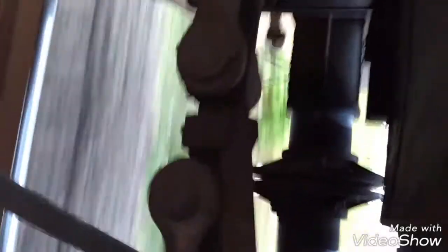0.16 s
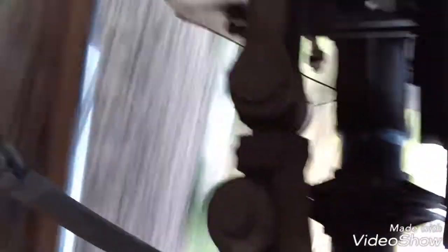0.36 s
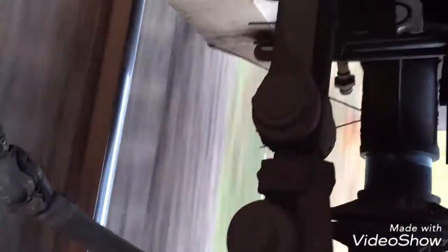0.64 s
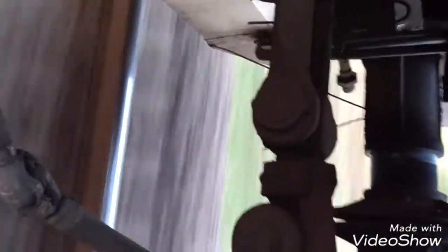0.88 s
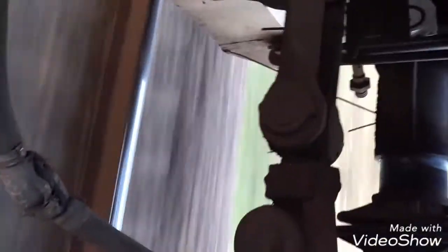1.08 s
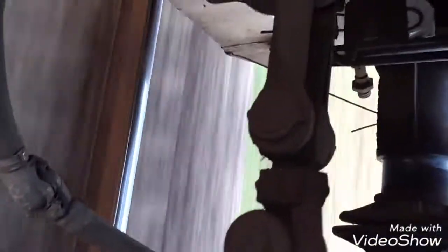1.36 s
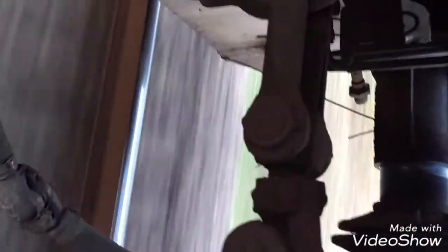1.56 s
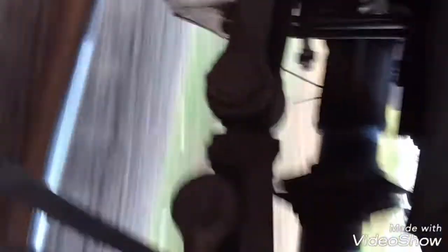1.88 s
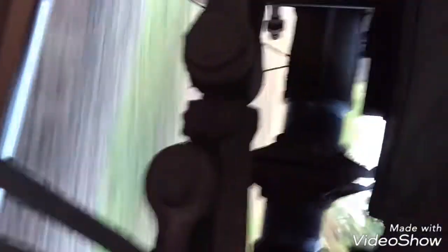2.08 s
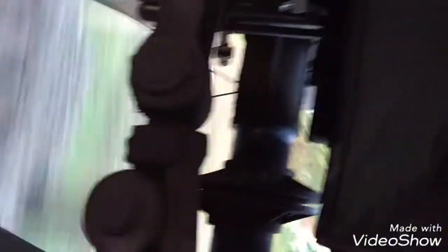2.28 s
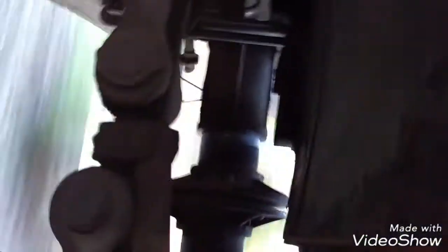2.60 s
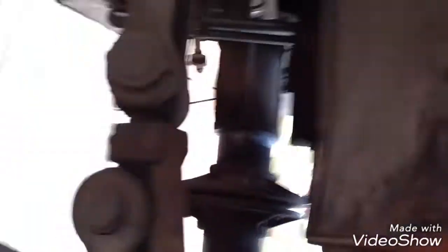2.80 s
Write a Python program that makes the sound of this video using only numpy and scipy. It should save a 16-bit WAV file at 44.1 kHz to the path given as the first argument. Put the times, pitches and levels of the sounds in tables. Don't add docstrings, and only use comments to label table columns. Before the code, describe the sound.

A fast train's harsh, hissing wheel roar runs throughout, heard close at the gap between coaches; rapid dull thumps, coupling rattles and brief flange scrapes ride on it, while wind gusts on the phone microphone make it duck.

```python
import sys
import numpy as np
from scipy import signal
from scipy.fft import rfft, irfft
from scipy.io import wavfile
from scipy.ndimage import uniform_filter1d

SR = 44100
rng = np.random.default_rng(int(sys.argv[2]) if len(sys.argv) > 2 else 0)


def ratio(d):
    e = np.asarray(d, float) / 20
    return 10 ** e


def transcribe(signal):
    frames = np.atleast_2d(signal).T
    limited = np.clip(frames, -1, 1)
    pcm = np.round(limited * 32767).astype(np.int16)
    wavfile.write(sys.argv[1], SR, pcm)


N = 129654

# frequency in Hz, density in dB per Hz.
ROAR_LEFT = [(900, -12), (1500, -9.5), (2000, -5), (2600, -0.5), (3400, -1), (4200, -1), (5000, -4),
             (7500, -10.5)]
ROAR_RIGHT = [(900, -12.5), (1500, -6.5), (2400, 3.5), (3500, -1.5), (4100, 0.5), (5100, -8), (6300, -4),
              (8200, -15.5)]
# centre in seconds, length in seconds, level in dB, pitch in Hz.
SCRAPES = [(.16, 0.036, -16, 2460), (.28, 0.041, -16, 2290), (.385, 0.04, -11.5, 2300),
           (.46, 0.07, -19.5, 2010), (.58, 0.026, -16.5, 2430), (.64, 0.026, -17, 2930),
           (.71, 0.051, -15.5, 2470), (.795, 0.024, -11, 2200), (.98, 0.04, -14, 2800),
           (1.08, 0.052, -17, 2650), (1.235, 0.036, -15, 2350), (1.4, .04, -23, 2480),
           (2.0, 0.12, -19, 2600), (2.32, 0.029, -12.5, 1960), (2.39, 0.095, -17, 2440),
           (2.44, 0.066, -20, 3800), (2.77, 0.048, -23, 2300), (2.92, 0.03, -20, 1650),
           (.283, 0.024, -20, 1500), (.335, 0.021, -23, 1490), (.475, .025, -24, 1510),
           (1.04, 0.01, -16.5, 2010), (1.1, 0.035, -18, 2720), (1.56, .03, -14, 2480),
           (1.88, .03, -20, 2370), (1.97, 0.022, -25, 1510), (2.24, .025, -23.5, 1490),
           (2.42, 0.017, -28, 1510)]
# start in seconds, level in dB, pitch in Hz.
THUMPS = [(0.03, -17.5, 174.5), (0.11, -16.5, 174), (.162, -22, 176), (0.199, -13, 161), (.247, -28, 176),
          (0.284, -19, 177), (0.373, -13, 170), (.421, -21.5, 175), (.483, -24.5, 177), (0.522, -16, 161.5),
          (0.615, -29, 175), (0.655, -22, 176), (0.689, -15, 198), (0.773, -22.5, 184), (.925, -28, 161),
          (1.131, -22, 166), (1.189, -21, 191), (1.305, -20.5, 248), (1.348, -29, 200), (1.391, -21.5, 165),
          (1.476, -16.5, 171), (1.565, -24, 173), (1.617, -24.5, 174), (1.637, -21.5, 190),
          (1.735, -16.5, 181), (1.828, -20.5, 166), (1.997, -19.5, 177), (2.044, -26, 175),
          (2.078, -15, 174), (2.132, -18, 168), (2.164, -12, 184), (2.256, -10.5, 165.5), (2.307, -18, 169),
          (2.344, -29, 175), (2.423, -16.5, 178), (2.504, -14.5, 204), (2.601, -13.5, 177),
          (2.697, -20.5, 163), (2.781, -28, 150)]
# start in seconds, level in dB, pitch in Hz.
KNOCKS = [(0.025, -14.5, 890), (0.115, -15.5, 410), (0.198, -10, 380), (0.284, -12.5, 396),
          (.324, -16.5, 694), (0.375, -16, 790), (.514, -18, 555), (0.597, -11, 730), (0.772, -16.5, 450),
          (0.951, -12.5, 720), (1.034, -13.5, 620), (1.045, -14, 840), (1.117, -12.5, 480),
          (1.125, -13.5, 800), (1.22, -14.5, 497), (1.297, -19.5, 794), (1.378, -12, 780),
          (1.4, -15.5, 457), (1.52, -15.5, 780), (1.56, -21, 660), (1.728, -27, 600), (1.897, -24, 430),
          (1.997, -11.5, 714), (2.164, -9.5, 590), (2.251, -13, 560), (2.336, -11, 560), (2.434, -9.5, 660),
          (2.504, -10.5, 523), (2.668, -12, 700), (2.756, -15.5, 770), (2.911, -24, 560), (2.861, -13, 437)]
# peak in seconds, level in dB.
BOOMS = [(0.05, -22.5), (.136, -22), (.211, -27), (.265, -28), (.308, -25.5), (.397, -22.5), (.493, -32),
         (.552, -23.5), (.633, -27), (.724, -30), (.777, -26), (.898, -29), (.95, -31), (1.109, -40),
         (1.2, -30), (1.277, -36), (1.408, -22.5), (1.481, -34), (1.575, -32), (1.618, -27), (1.747, -26),
         (1.842, -35), (2.022, -26), (2.097, -19), (2.17, -26), (.6, -32), (2.284, -18), (2.527, -22),
         (2.618, -19.5), (2.673, -29), (2.718, -28), (2.797, -31), (2.873, -25)]
# frequency in Hz, density in dB per Hz.
RUMBLE = [(30, -15), (65, -9), (100, -4), (130, -1.5), (180, -4), (250, -3), (800, 1.5), (1100, -12.5)]
# centre in seconds, length in seconds, hiss rise in dB, ducking of the train in dB.
GUSTS = [(0.01, 0.053, 2.5, 2), (0.239, 0.016, 2.5, 5), (0.3, 0.009, 6.5, 13), (0.482, 0.0081, 5.5, 9),
         (0.543, 0.013, 3, 4.5), (0.731, 0.02, 2.5, 4), (0.904, 0.037, 1, 5), (1.03, 0.084, -1, 2.5),
         (1.138, 0.014, 5.5, 5), (1.176, 0.032, 5.5, 5.5), (1.28, 0.02, 2.5, 0), (1.773, 0.045, .3, 1.5),
         (1.495, .02, -1, 2), (1.677, 0.036, 1.5, 5.5), (1.926, 0.027, 2.5, 5.5), (1.96, 0.021, -1, 1),
         (0.643, 0.02, -4, 2), (1.264, .03, -2, 1), (2.456, 0.016, -4, 0.5), (0.134, 0.074, -3, 0),
         (2.362, 0.02, 3, 3.5), (2.418, 0.025, -2, -0.5), (2.61, 0.056, 2, 1), (2.823, 0.023, 4.5, 4),
         (2.88, .05, 0, 2.5)]
# frequency in Hz, density in dB per Hz.
HISS_LEFT = [(4000, -1.5), (6000, 3), (8000, 0.5), (10500, 0.5), (13800, -3), (14800, -4.5), (15800, -10)]
HISS_RIGHT = [(1500, -10), (4000, -2), (7000, 0), (8800, -8), (10800, -10), (12000, -14), (13800, -16),
              (15500, -24)]
# centre in seconds, length in seconds, level in dB, pitch in Hz.
WHISTLES = [(.25, 0.067, -13, 7950), (.72, 0.038, -13, 6160), (.91, 0.044, -12.5, 9800),
            (1.5, 0.037, -16, 7640), (2.43, 0.017, -10, 7400), (2.87, 0.19, -14, 7560),
            (2.9, 0.076, -14, 12900), (.045, .04, -17, 12600), (.23, 0.024, -14, 12200),
            (.86, 0.055, -16, 12800), (1.01, 0.086, -14.5, 12800), (1.52, .05, -22, 12100),
            (2.77, 0.035, -22, 10300)]
# frequency in Hz, margin below the local level in dB.
THINNING_MARGIN = [(1500, 18), (3000, 8), (4600, .8), (8000, 2), (10000, 5), (14500, 2.5), (15700, -5)]

LOW_LEAD_S, ROAR_LEAD_S = 0.00013, 0.000429
BEAT_HZ, BEAT_S = 11.6, 0.031


def level(x):
    return x / np.sqrt(np.mean(x ** 2))


def ports(left_db, right_db):
    return ratio(np.array([left_db, right_db]))[:, None]


def walk(rate):
    k = int(SR / rate)
    held = np.repeat(rng.standard_normal(N // k + 1), k)
    w = uniform_filter1d(uniform_filter1d(held, k), k)[:N]
    return level(w - uniform_filter1d(w, 5 * k))


def late(x, s):
    return np.interp(np.arange(N) - s * SR, np.arange(N), x)


def add(out, s, x):
    i = int(s * SR)
    x, i = x[max(-i, 0):], max(i, 0)
    out[i:i + len(x)] += x[:len(out) - i]


def colour(curve, hz):
    points_hz, points_db = np.array(curve).T
    db = np.interp(np.log(hz), np.log(points_hz), points_db)
    below = np.maximum(np.log2(points_hz[0] / hz), 0)
    above = np.maximum(np.log2(hz / points_hz[-1]), 0)
    return ratio(db - 24 * below - 24 * above)


def patchy(left, right, alike, lead_s, swell_db, flicker_db, rate, per_octave=3):
    hz = np.maximum(np.arange(N // 2 + 1) * SR / N, 1)
    shared, a, b = (rfft(rng.standard_normal(N)) for _ in range(3))
    lead = np.exp(2j * np.pi * hz * lead_s)
    common, own = alike ** .5, (1 - alike) ** .5
    spec = np.array([colour(left, hz) * (common * shared * lead + own * a),
                     colour(right, hz) * (common * shared + own * b)])
    top = int(np.log2(left[-1][0] / left[0][0]) * per_octave) + 1
    place = np.clip(np.log2(hz / left[0][0]) * per_octave, 0, top)
    out, swell = 0, walk(rate / 3)
    for k in range(top + 1):
        swell = level(swell + 0.38 * walk(rate / 3))
        band = np.cos(np.pi / 2 * np.clip(place - k, -1, 1)) ** 2
        out = out + irfft(spec * band, N) * ratio(swell_db * swell + flicker_db * walk(rate))
    return out / np.sqrt(np.mean(out ** 2, axis=1, keepdims=True))


def bursts(table, width_hz):
    peak_s = .09
    out, t, hz_axis = np.zeros((2, N)), np.arange(8192) / SR, np.arange(4097) * SR / 8192
    for (s, length_s, db, hz), noise in zip(table, rng.standard_normal((len(table), 2, 8192))):
        resonance = np.exp(-((hz_axis - hz) / width_hz) ** 2)
        swell = np.exp(-2 * ((t - peak_s) / length_s) ** 2)
        x = ratio(db) * level(irfft(rfft(noise) * resonance)) * swell
        add(out[0], s - peak_s, x[0])
        add(out[1], s - peak_s, x[1])
    return out


def rolling_roar(beat, duck_db):
    roar = patchy(ROAR_LEFT, ROAR_RIGHT, 0.14, ROAR_LEAD_S, swell_db=0.73, flicker_db=0.66, rate=20)
    roar = roar * ratio(0.65 * beat - duck_db)
    drone = signal.sosfiltfilt(signal.butter(3, 1900, fs=SR, output="sos"), roar)
    roar = roar + drone * (ratio(.8 - .9 * duck_db) - 1)
    return roar * ports(-8.5, -10)


def flange_scrapes():
    return bursts(SCRAPES, width_hz=400) * ports(2.1, 2.2)


def thumps():
    rise_s, t60_s = .012, .075
    out, t = np.zeros(N), np.arange(int(.2 * SR)) / SR
    shape = (1 - np.exp(-(t / rise_s) ** 2)) * np.exp(-np.log(1000) * t / t60_s)
    for (s, db, hz), c in zip(THUMPS, rng.standard_normal((len(THUMPS), 4))):
        ring = np.sin(2 * np.pi * hz * t + 3 * c[0])
        ring = ring + 0.45 * np.sin(2 * np.pi * 1.55 * hz * (1 + .1 * c[2]) * t + 3 * c[1])
        add(out, s, ratio(db + 0.5) * ring * shape / shape.max())
    return out


def knocks():
    rise_s, fall_s = .01, .017
    out, t = np.zeros(N), np.arange(4096) / SR
    hz_axis = np.arange(2049) * SR / 4096
    shape = (1 - np.exp(-(t / rise_s) ** 2)) * np.exp(-t / fall_s)
    body = ratio(-3) * np.exp(-((hz_axis - 520) / 360) ** 2)
    for (s, db, hz), noise in zip(KNOCKS, rng.standard_normal((len(KNOCKS), 4096))):
        link = np.exp(-((hz_axis - hz) / 147) ** 2)
        rattle = level(irfft(rfft(noise) * (link + body)))
        add(out, s, ratio(db - 4.5) * rattle * shape / shape.max())
    return out


def blows():
    hits = thumps() + knocks()
    return np.array([hits, ratio(-6.5) * late(hits, LOW_LEAD_S)])


def booms():
    boom_hz, boom_s, peak_s = 100, 0.023, .04
    out, t = np.zeros(N), np.arange(int(.12 * SR)) / SR - peak_s
    shape = np.exp(-2 * (t / (boom_s * np.where(t < 0, .7, 1.2))) ** 2)
    for (s, db), c in zip(BOOMS, rng.standard_normal((len(BOOMS), 2))):
        tone = np.sin(2 * np.pi * boom_hz * (1 + .07 * c[0]) * t + 3 * c[1])
        add(out, s - peak_s, ratio(db) * shape * tone)
    return np.array([out, ratio(-2.5) * late(out, LOW_LEAD_S)])


def underframe_rumble(beat, duck_db):
    rumble = patchy(RUMBLE, RUMBLE, 0.4, LOW_LEAD_S, swell_db=-0.2, flicker_db=2.0, rate=22)
    return rumble * ratio(2 * beat - 1.8 * duck_db) * ports(-25, -28)


def gusts():
    t = np.arange(N) / SR
    bells = np.array([np.exp(-2 * ((t - s) / length_s) ** 2) for s, length_s, _, _ in GUSTS])
    return np.array(GUSTS)[:, 2] @ bells, np.array(GUSTS)[:, 3] @ bells


def wind(rise_db):
    hiss = patchy(HISS_LEFT, HISS_RIGHT, 0, 0, swell_db=1.0, flicker_db=1.1, rate=35) * ratio(rise_db)
    return hiss * ports(-9.5, -19) + bursts(WHISTLES, width_hz=1640) * ports(3, -20)


def scene():
    rise_db, duck_db = gusts()
    beat = np.cos(2 * np.pi * BEAT_HZ * (np.arange(N) / SR - BEAT_S))
    wheels = rolling_roar(beat, duck_db) + flange_scrapes()
    frame = blows() + booms() + underframe_rumble(beat, duck_db)
    return wheels + frame + wind(rise_db)


def gain_control(x):
    power = uniform_filter1d(x[0] ** 2, int(.025 * SR))
    return x * (power / power.mean() + 1e-6) ** (-.4 / 2)


def thin_lines(x):
    window = np.sin(np.pi * (np.arange(2048) + .5) / 2048)
    hz, _, z = signal.stft(x, SR, window, 2048, 1024)
    power = abs(z) ** 2
    power_db = 10 * np.log10(power + 1e-12)
    local = uniform_filter1d(uniform_filter1d(power, size=48, axis=1), size=5, axis=2)
    local_db = 10 * np.log10(local + 1e-12)
    quiet_db = 10 * np.log10(np.sum(power, axis=1, keepdims=True)) - 39
    quiet_db = quiet_db - 60 * (hz < 7000)[:, None]
    band = (24 * np.log(1 + hz / 2500)).astype(int)
    waver = rng.standard_normal((2, 64, z.shape[2]))
    waver = uniform_filter1d(waver + waver[:1], size=3, axis=2) * np.array([.87, 1.22])[:, None, None]
    margin_db = np.interp(hz, *np.array(THINNING_MARGIN).T)[:, None]
    edge_db = np.maximum(local_db - margin_db, quiet_db) + 3.8 * waver[:, band]
    return signal.istft(z * (power_db > edge_db), SR, window, 2048, 1024)[1][:, :N]


def top_cut(x):
    return signal.sosfilt(signal.butter(12, 15750, fs=SR, output="sos"), x)


def record(dry):
    shift = 408
    clipped = np.clip(gain_control(dry), -0.97, 0.97)
    x = thin_lines(np.pad(clipped, ((0, 0), (shift, 0)))[:, :N])
    x = np.pad(x[:, shift:], ((0, 0), (0, shift)), mode="reflect")
    return top_cut(x)


dry = scene()
out = record(dry)
transcribe(out)
```